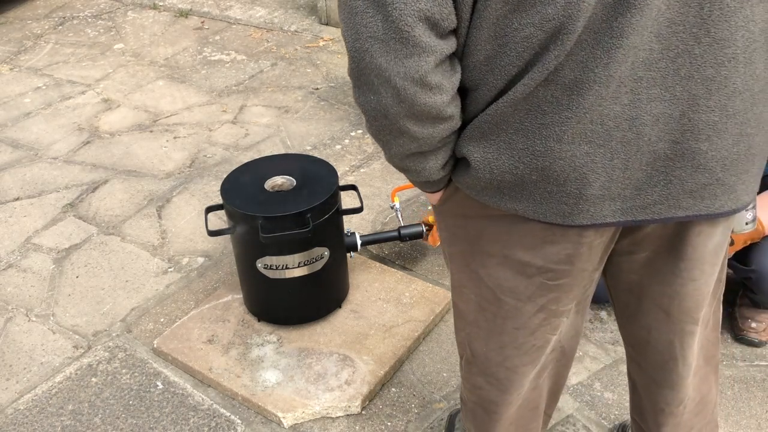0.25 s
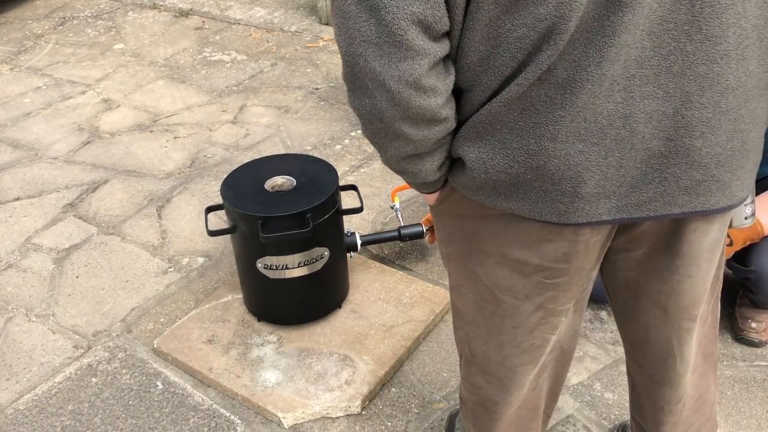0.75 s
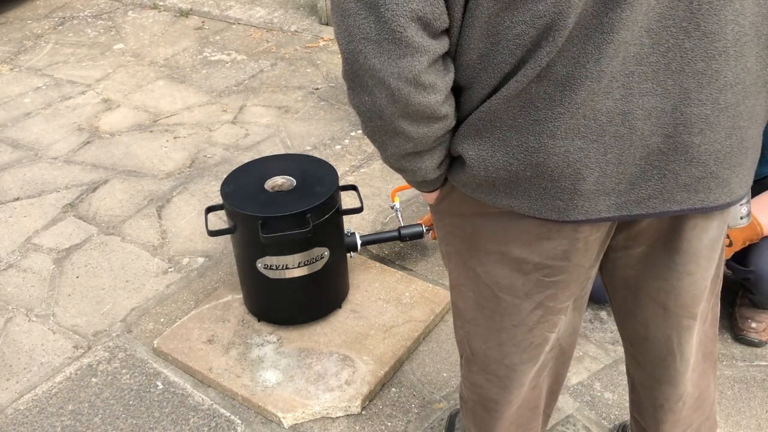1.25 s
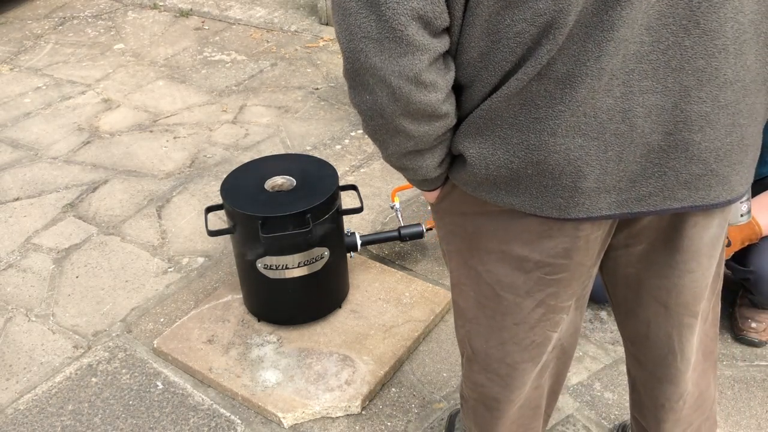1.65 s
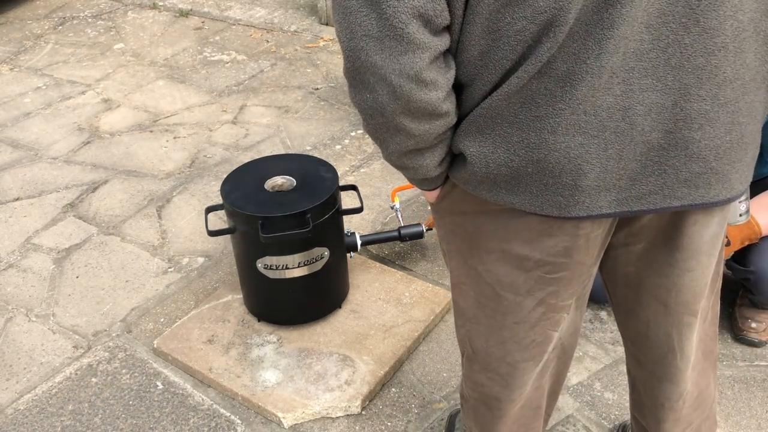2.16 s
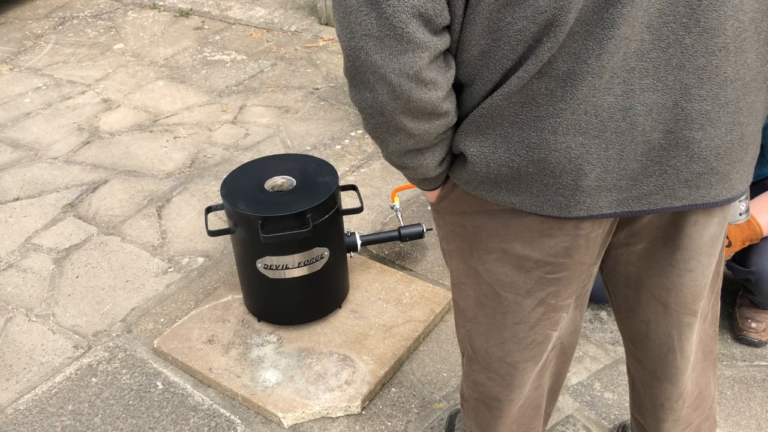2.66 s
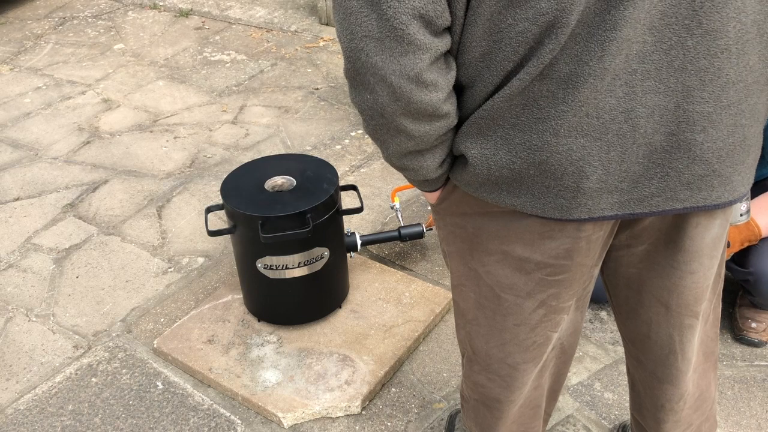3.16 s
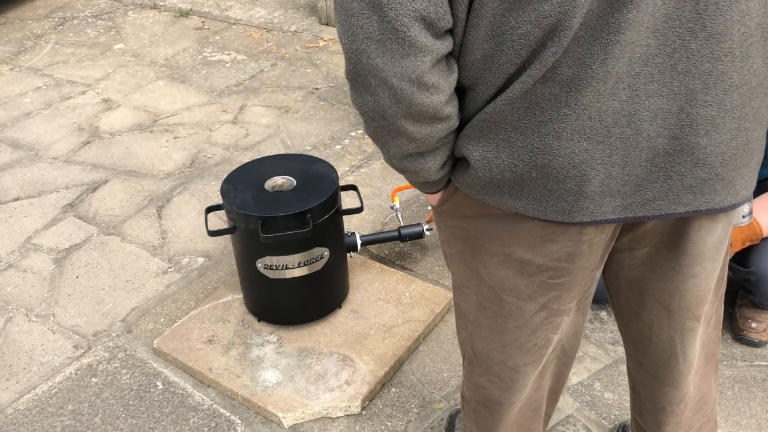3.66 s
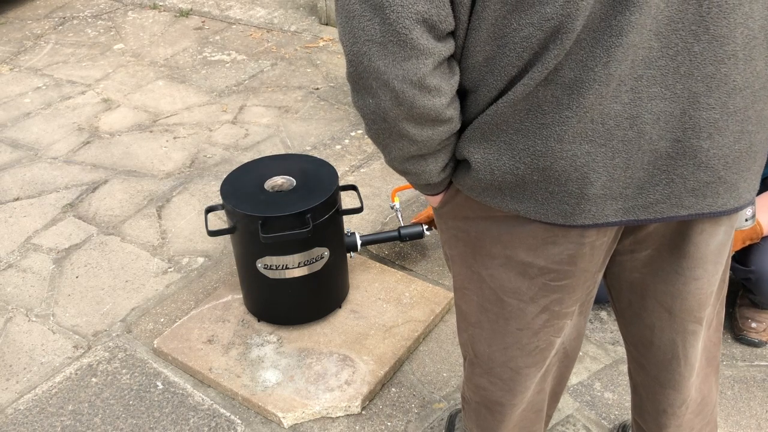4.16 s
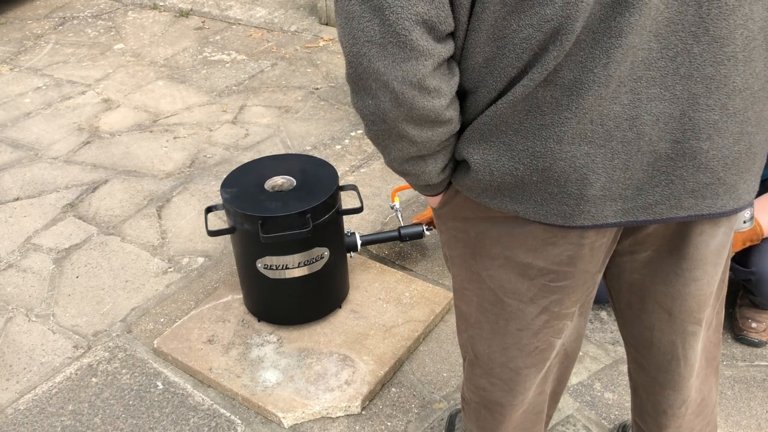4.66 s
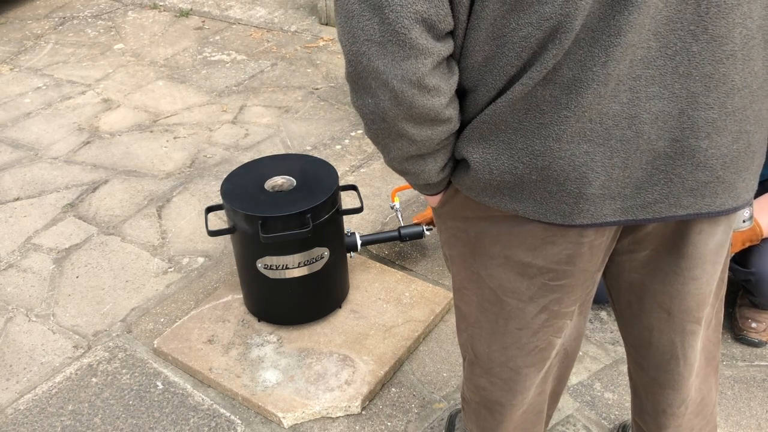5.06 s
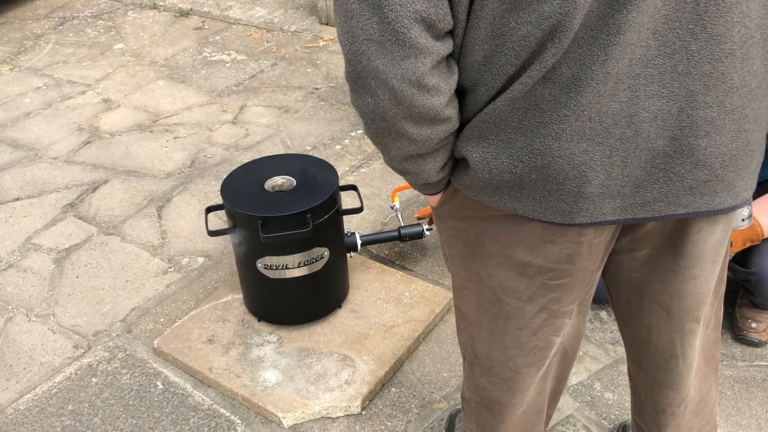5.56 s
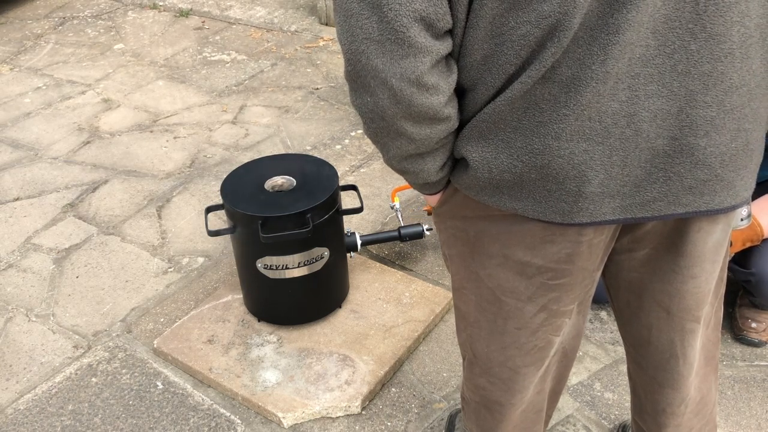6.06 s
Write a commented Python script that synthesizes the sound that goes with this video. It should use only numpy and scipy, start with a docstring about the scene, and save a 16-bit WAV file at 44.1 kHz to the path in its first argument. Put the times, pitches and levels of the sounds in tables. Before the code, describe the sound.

A gas burner fires into a small steel furnace close by in a paved yard. During the first half second it is turned up: the low roar swells and a faint, breathy whistle steps up in pitch. The deep rumble then continues to the end, at about 6.5 seconds, growing slightly louder, with a fluttering sputter from the flame and a softer, slightly ringing gas hiss above it. The roar dips for an instant at about 1, 1.3 and 3.2 seconds and surges briefly at about 3.3 and 4.5 seconds. The sputter has small peaks near 0.8 seconds and between 3 and 4 seconds. One short, hard click comes at about 2.5 seconds. A small bird chirps faintly in the distance, barely audible at 1.7 seconds, then twice around 4 seconds and in a quick run from 4.8 to 5.2 seconds.

```python
"""A propane burner is turned up, then fires steadily into a small steel furnace on a paved yard.
Unsteady heat release in the turbulent flame radiates sound: it booms in the chamber and sputters
at the mouth. The gas jet hisses and drives the resonances of the burner tube and its air intake.
A small bird chirps some way off among the yard's echoes, and something clicks once."""
import sys
import numpy as np
from scipy import signal
from scipy.fft import rfft, irfft, next_fast_len
from scipy.io import wavfile
from scipy.ndimage import uniform_filter1d, map_coordinates

SR = 44100
rng = np.random.default_rng(int(sys.argv[2]) if len(sys.argv) > 2 else 0)


def master(y):
    """Save y as 16-bit WAV."""
    cut = np.clip(np.atleast_2d(y).T, -1, 1)
    pcm = np.round(cut * 32767)  # scale
    wavfile.write(sys.argv[1], SR, pcm.astype(np.int16))


N = 277830
TIME_S = np.arange(N) / SR


def amp(db):
    """Amplitude ratio of a level in decibels."""
    return 10 ** (np.asarray(db) / 20)


def unit(x):
    """Normalisation to rms 1."""
    return x / np.sqrt(np.mean(x ** 2) + 1e-20)


def along(points, hz):
    """Interpolation of (frequency_hz, value) points on a logarithmic frequency axis."""
    knot_hz, values = np.transpose(points)
    return np.interp(np.log(hz + 1), np.log(knot_hz + 1), values)


def noise():
    """Gaussian white noise as long as the scene."""
    return rng.standard_normal(N)


def wobble(rate_hz):
    """Random modulation: a spline through rate_hz random knots a second."""
    return map_coordinates(rng.standard_normal(N // 8), [TIME_S * rate_hz + 2], mode="wrap")


def swells(rows):
    """Level modulation in dB: one raised cosine for each (middle_s, length_s, gain_db)."""
    return sum(db * np.cos(np.pi * np.clip((TIME_S - middle_s) / length_s, -.5, .5)) ** 2
               for middle_s, length_s, db in rows)


def add(track, start_s, sound):
    """Superposition of a sound on the track."""
    part = track[round(start_s * SR):][:len(sound)]
    part += sound[:len(part)]


def filtered(x, response):
    """Linear filtering: the spectrum of x times a frequency response."""
    size = next_fast_len(N + SR // 2)
    return irfft(rfft(x, size) * response(np.fft.rfftfreq(size, 1 / SR)), size)[:N]


def coloured(x, spectrum):
    """Spectral shaping by (frequency_hz, gain_db) points, at rms 1."""
    return unit(filtered(x, lambda hz: amp(along(spectrum, hz))))


def resonate(x, modes):
    """Forced response of steep-sided resonances that add in power, at rms 1."""
    def power(hz):
        return sum((amp(db) / (1 + ((hz - pitch_hz) / half_width_hz) ** 2)) ** 2
                   for pitch_hz, half_width_hz, db in modes)
    return unit(filtered(x, lambda hz: np.sqrt(power(hz))))


def gas_flow():
    """Flow in dB re its nominal value: exponential relaxation as the valve opens, plus a slow creep."""
    opening_db, opening_s, creep_db_per_s = 7, .3, 0.33
    return creep_db_per_s * TIME_S - opening_db * np.exp(-TIME_S / opening_s)


def ignitions(rate_hz, spread_db=2.5):
    """Shot noise: each pocket of gas that ignites gives a pressure pulse of random size."""
    ignites = rng.random(N) < rate_hz / SR
    return unit(ignites * np.sign(noise()) * amp(spread_db * noise()))


# Response of the chamber: frequency_hz, gain_db
CHAMBER_SPECTRUM = [(8, -60), (20, -36), (32, -22), (60, -9.5), (100, -6), (135, 0.65), (160, -1.16),
                    (183, -3), (218, -0.5), (275, -11), (312, -17), (340, -15.5), (395, -29), (520, -42.5),
                    (1200, -105.9)]
# The flame surges (+) or gutters (-): middle_s, length_s, gain_db
SURGES = [(.53, .45, 3), (1.05, 0.068, -7.5), (1.26, 0.085, -10.5), (1.85, 1, 1.5), (2.6, 0.31, 2.5),
          (3.15, 0.092, -9), (3.33, 0.23, 3.5), (4.15, 0.9, -2.5), (4.55, 0.15, 6.5), (4.85, 0.26, -2.5),
          (6.18, 0.38, 2)]
def chamber_roar(flow_db):
    """Combustion noise: dense ignitions boom in the chamber; all but the deep rumble follows the flow."""
    rumble_db, rumble_edge_hz = -25, 106
    boom_db = -25 + 1.2 * flow_db
    pressure = coloured(ignitions(rate_hz=1500), CHAMBER_SPECTRUM)
    rumble = filtered(pressure, lambda hz: 1 / (1 + (hz / rumble_edge_hz) ** 4))
    roar = amp(rumble_db) * rumble + amp(boom_db) * (pressure - rumble)
    return amp(swells(SURGES) + 0.66 * wobble(25)) * roar


# Spectrum of the flame at the mouth: frequency_hz, gain_db
MOUTH_SPECTRUM = [(150, -38), (380, -7.5), (425, -1), (515, -3.5), (630, 2), (780, -3), (1000, -8.5),
                  (1200, -14), (1450, -13), (1900, -20.5), (2400, -47.5), (4000, -72)]
# Brief random peaks in the sputter's loudness: start_s, gain_db
SPUTTER_PEAKS = [(.777, 4.5), (0.824, 6), (.908, 3.5), (2.957, 7), (3.001, 6.5), (3.141, 6.5), (3.583, 9),
                 (3.86, 5), (4.367, 3.5)]
# The flame licks out (+) or draws back (-): middle_s, length_s, gain_db
FLAME_LICKS = [(.7, .7, 1.2), (1.15, 0.12, 3), (1.44, 0.2, 4.6), (1.95, .6, -0.1), (2.33, 0.54, 3.5),
               (2.85, 1.2, 3), (5.35, 1.44, 2), (5.9, 0.58, -1.5)]
def mouth_sputter(flow_db):
    """Amplitude modulation: the fluttering flame at the mouth makes sparser ignitions sputter."""
    rise_s = 0.0032
    age = np.arange(SR // 20) / (SR * rise_s)  # in rise times
    peak_gain = np.ones(N)
    for start_s, gain_db in SPUTTER_PEAKS:
        add(peak_gain, start_s, (amp(gain_db) - 1) * age * np.exp(1 - age))
    flutter = peak_gain * amp(1.03 * wobble(30) + 1.24 * wobble(130))
    burning = ignitions(rate_hz=1000) + .7 * noise()
    level_db = -44.5 + 1.23 * flow_db + swells(FLAME_LICKS) + 0.87 * wobble(12)
    return amp(level_db) * coloured(flutter * burning, MOUTH_SPECTRUM)


def turbulence(depth_db):
    """Band-wise modulation: noise whose bands, some 300 Hz wide, swell and fade independently."""
    bands = signal.stft(noise(), nperseg=512)[2]
    swell = uniform_filter1d(rng.standard_normal(bands.shape), size=4, axis=0)  # across frequency
    swell = uniform_filter1d(swell, size=30, axis=1)  # across time
    return signal.istft(bands * amp(depth_db * unit(swell)), nperseg=512)[1][:N]


# Smooth rush of the jet: frequency_hz, gain_db
JET_SPECTRUM = [(500, -22.0), (1500, -2.0), (2400, -3.6), (2850, -4.8), (3550, -14), (4200, -6.6),
                (4750, -9.5), (5550, -7), (6500, 0.0), (7150, -7), (7700, -17), (8500, -14.0),
                (9900, -24.6), (10800, -18.1), (12500, -21.4), (15500, -20.5)]
def jet_hiss(flow_db):
    """Jet noise: turbulent mixing radiates a broadband hiss that grows with the flow."""
    return amp(-58 + 0.52 * flow_db) * coloured(turbulence(depth_db=3.1), JET_SPECTRUM)


# Resonances of the burner tube and its intake: pitch_hz, half_width_hz, gain_db
LOW_TUBE_MODES = [(1584, 46, 0.0), (2115, 100, -8.5)]
HIGH_TUBE_MODES = [(3136, 62, -.7), (3751, 60, -8.6), (3890, 55, -9), (4440, 75, -2.8), (4965, 70, 1),
                   (5302, 95, 0.3), (5711, 89, -3), (7405, 55, -4.5), (8050, 140, -9.3), (10320, 66, -16.6),
                   (13254, 99, -22.6), (14700, 120, -21.0)]
# Slow drift of the ring: time_s, low_level_db, high_level_db
RING_LEVELS = [(0, -57, -61), (.7, -55, -62), (1.2, -55.5, -60), (1.6, -59, -59), (2.2, -57.5, -59.5),
               (2.6, -53.5, -59), (3.5, -56, -60), (4.1, -53.5, -59.5), (5.8, -52.5, -58), (6.3, -52, -60)]
def tube_ring():
    """Forced resonance: the jet's noise excites the narrow modes of the burner tube."""
    knot_s, low_levels_db, high_levels_db = np.transpose(RING_LEVELS)
    low_db = np.interp(TIME_S, knot_s, low_levels_db) + 1.2 * wobble(25)
    low_ring = resonate(turbulence(depth_db=1), LOW_TUBE_MODES)
    high_db = np.interp(TIME_S, knot_s, high_levels_db) + 0.58 * wobble(9)
    high_ring = resonate(turbulence(depth_db=1.5), HIGH_TUBE_MODES)
    return amp(low_db) * low_ring + amp(high_db) * high_ring


# Intake resonances before and after the hop: pitch_hz, half_width_hz, gain_db
OPENING_MODES = [(6300, 300, 0)]
SETTLED_MODES = [(6925, 130, 0.0), (11220, 125, -14.9)]
# The whistle falters (-) or picks up (+): middle_s, length_s, gain_db
WHISTLE_SWELLS = [(.45, 0.45, 1.5), (2.32, 0.5, -6), (2.75, .6, 2), (3.33, .3, -6)]
def intake_whistle(flow_db):
    """Mode hopping: the breathy whistle of the air intake jumps up in pitch as the valve opens."""
    hop_s, hop_length_s = 0.26, 0.044
    hopped = .5 + .5 * np.tanh((TIME_S - hop_s) / hop_length_s)
    settled_db = -62 + 0.46 * flow_db + swells(WHISTLE_SWELLS) + 1.07 * wobble(25)
    settled = amp(settled_db) * resonate(turbulence(depth_db=0), SETTLED_MODES)
    opening = amp(-62) * resonate(noise(), OPENING_MODES)
    return hopped * settled + (1 - hopped) * opening


# Arched notes: start_s, length_s, top_pitch_hz, end_drop_hz, relative_level_db
BIRD_NOTES = [(1.655, .035, 4100, 400, -64), (1.695, .035, 3450, 400, -62), (3.96, .034, 5450, 1750, -53),
              (4.019, .04, 3920, 480, -51), (4.797, .04, 2760, 260, -57), (4.854, .05, 2930, 330, -55),
              (4.91, .062, 3020, 330, -56), (5.165, .05, 3500, 400, -60)]
def bird():
    """Frequency modulation: each note arches in pitch and loudness, with a faint second harmonic."""
    song = np.zeros(N)
    quaver = 1 + 0.012 * wobble(250)
    for start_s, length_s, top_hz, drop_hz, level_db in BIRD_NOTES:
        position = np.linspace(-1, 1, round(length_s * SR))
        pitch_hz = (top_hz - drop_hz * position ** 2) * quaver[round(start_s * SR):][:len(position)]
        phase = 2 * np.pi * np.cumsum(pitch_hz) / SR
        tone = np.sin(phase) + amp(-21) * np.sin(2 * phase)
        add(song, start_s, amp(level_db + 1.5) * np.sqrt(1 - position ** 2) * tone)
    return filtered(song, lambda hz: 1 / (1 + (hz / 7000) ** 8))  # air and distance dull the overtones


# Reverberation time of the yard: frequency_hz, t60_s
YARD_DECAY = [(200, .25), (3000, 0.12), (10000, 0.1)]
def yard_echoes(sound):
    """Reverberation: reflections from walls and paving merge into an exponentially decaying tail."""
    hz, age_s, bands = signal.stft(rng.standard_normal(SR // 2), SR, nperseg=256)
    decay = amp(-60 * age_s / along(YARD_DECAY, hz)[:, None])
    tail = signal.istft(bands * decay, SR, nperseg=256)[1]
    return signal.fftconvolve(sound, tail / np.linalg.norm(tail))[:N]


# A contact and its rebound: start_s, level_db, t60_s
CONTACTS = [(2.451, -35, 0.037), (2.463, -36.5, 0.026)]
# Spectrum of the contacts: frequency_hz, gain_db
CONTACT_SPECTRUM = [(600, -21), (1600, 8.5), (2300, 3), (3200, -26), (4800, -14), (6500, -7), (9800, -28),
                    (15000, -34)]
def click():
    """Impact noise: a small hard contact and its rebound radiate brief bursts with no ring."""
    bursts, length = np.zeros(N), SR // 8
    age_s = np.arange(length) / SR
    crack = coloured(noise(), CONTACT_SPECTRUM)
    for i, (start_s, level_db, t60_s) in enumerate(CONTACTS):
        add(bursts, start_s, amp(level_db - 60 * age_s / t60_s) * crack[i * length:][:length])
    return bursts


def scene():
    """Superposition of the furnace close by, the distant bird with its echoes, and the click."""
    flow_db = gas_flow()
    flame = chamber_roar(flow_db) + mouth_sputter(flow_db)
    burner = jet_hiss(flow_db) + tube_ring() + intake_whistle(flow_db)
    draught = amp(0.57 * wobble(13))  # small swings of the air flow move all the hiss together
    song = bird()
    return (flame + draught * burner + song + amp(-6.5) * yard_echoes(song) + click())[None]


def record(dry):
    """Band limiting: the microphone passes nothing above its upper edge."""
    edge_hz = 15720
    return filtered(dry[0], lambda hz: hz < edge_hz)[None]


dry = scene()
out = record(dry)
master(out)
```